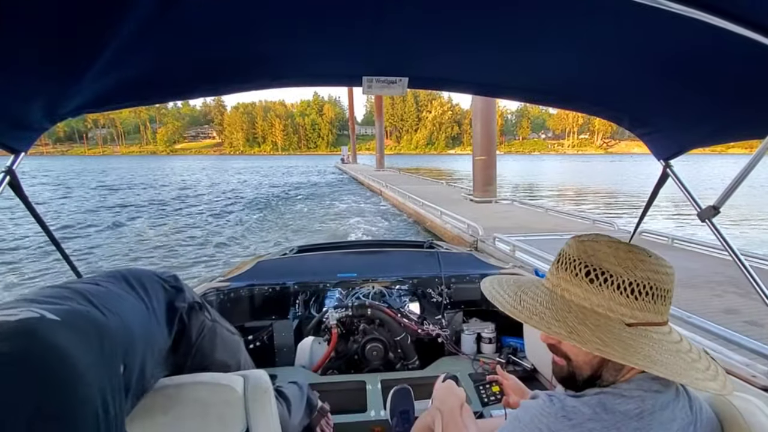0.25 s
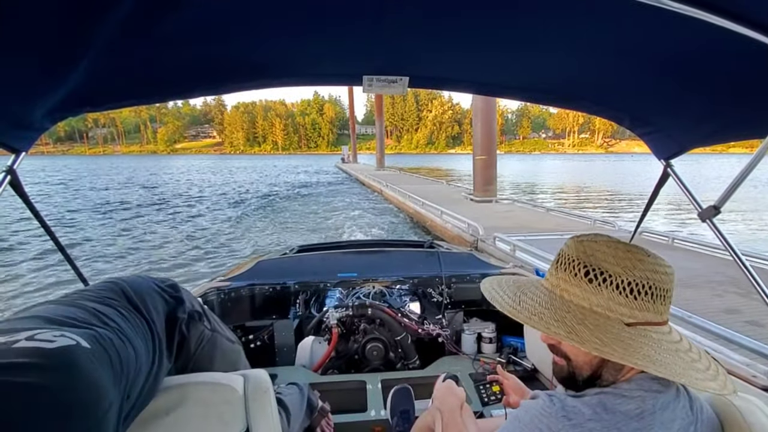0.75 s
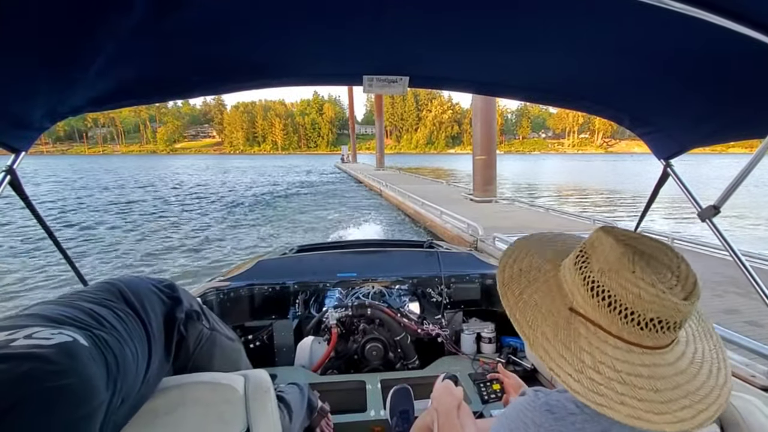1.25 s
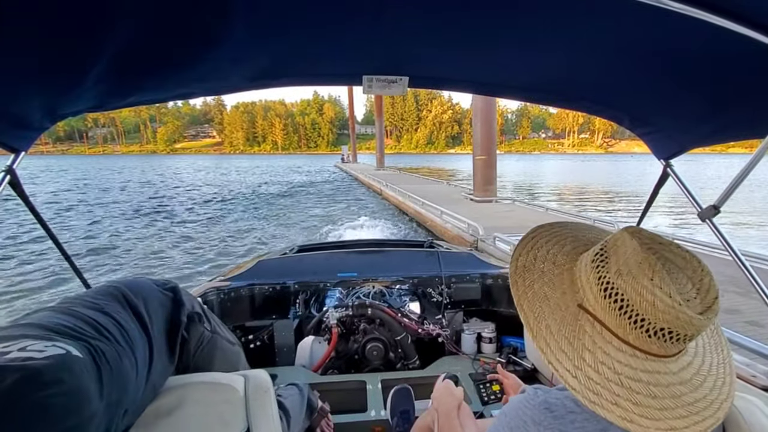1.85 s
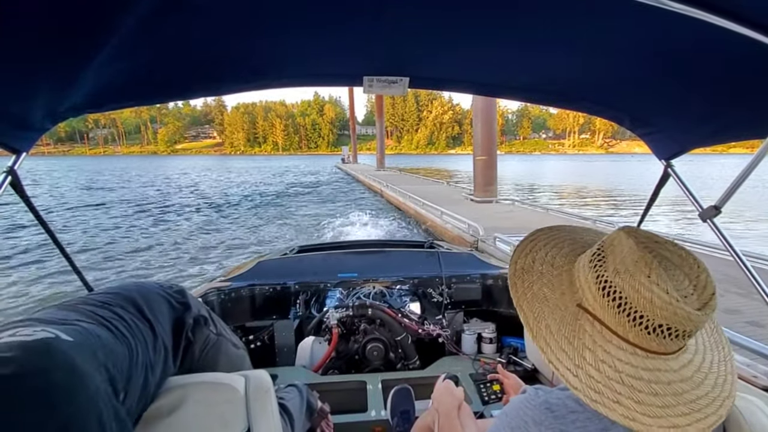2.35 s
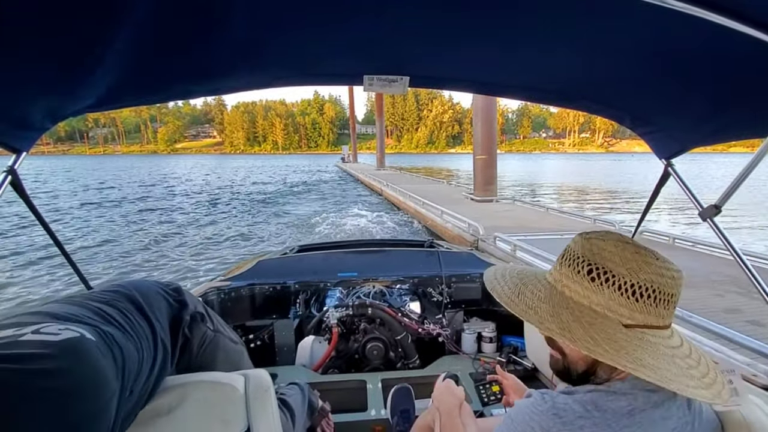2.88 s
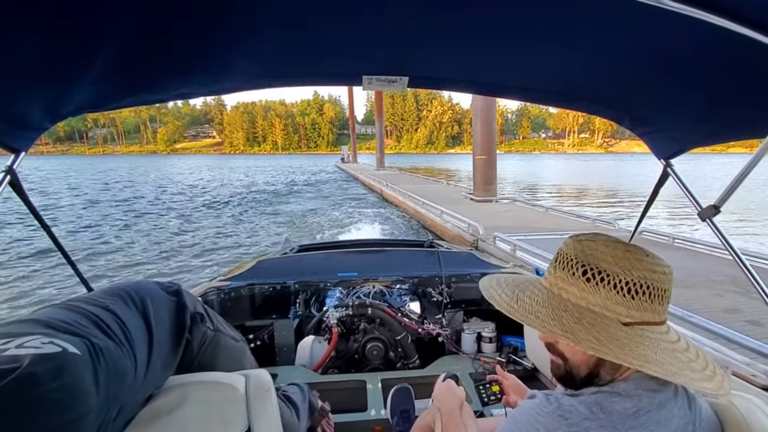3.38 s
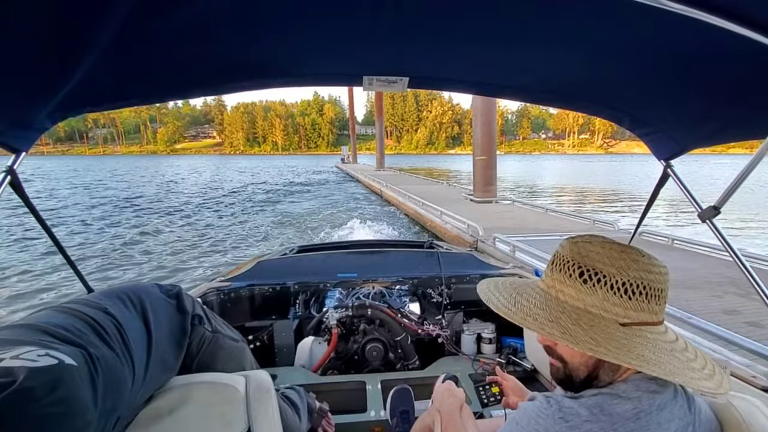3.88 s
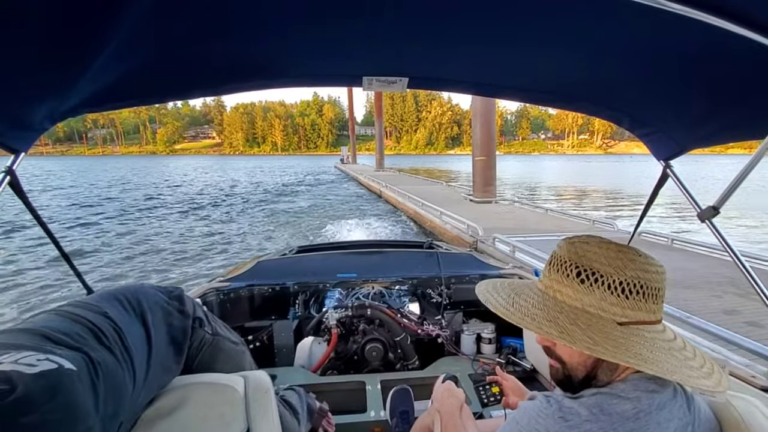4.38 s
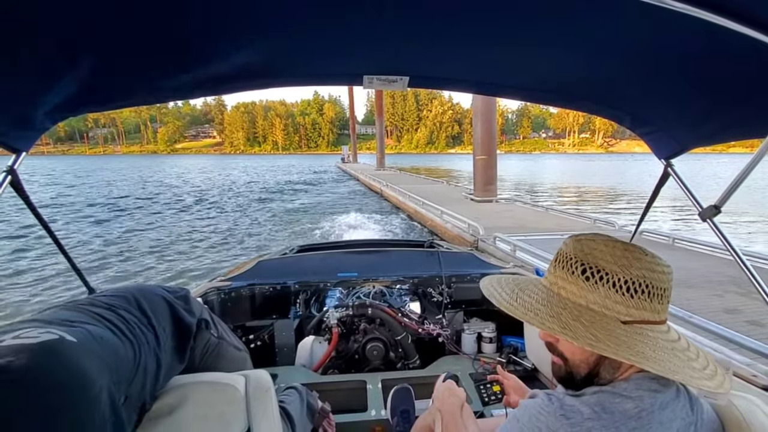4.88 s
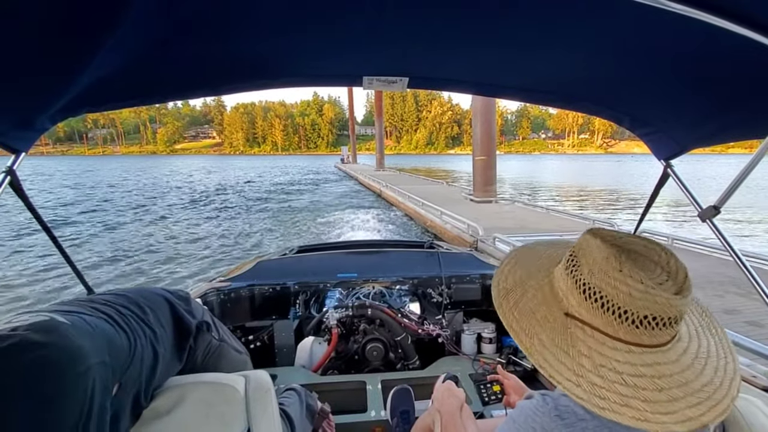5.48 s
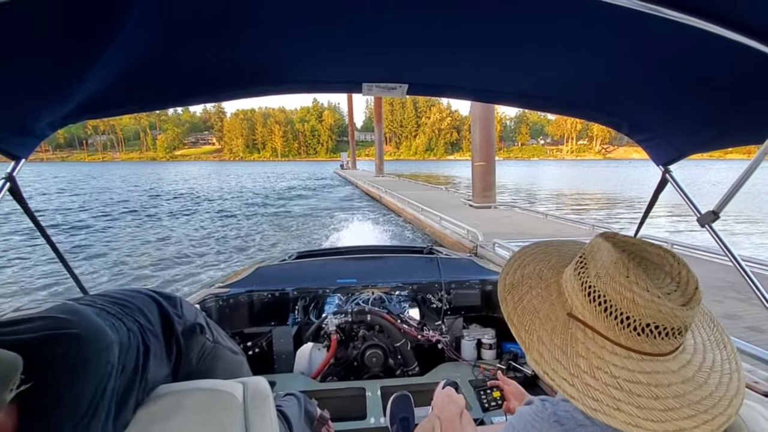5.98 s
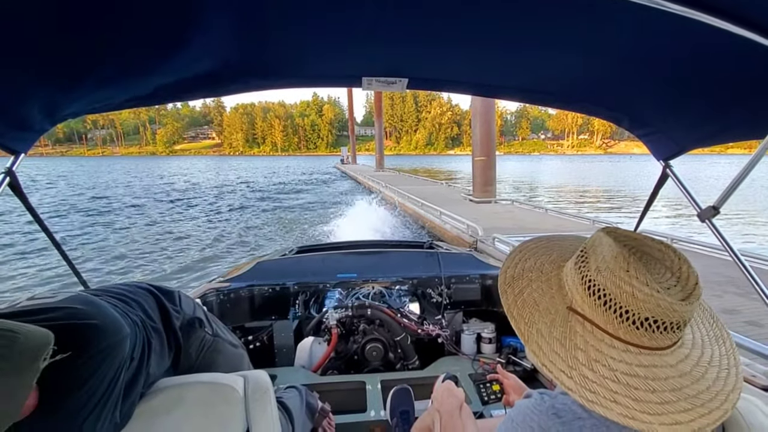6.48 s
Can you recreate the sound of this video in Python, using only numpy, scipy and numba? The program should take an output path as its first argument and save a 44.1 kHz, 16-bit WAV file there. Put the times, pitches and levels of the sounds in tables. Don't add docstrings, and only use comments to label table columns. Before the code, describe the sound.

A jet boat engine idles unevenly, heard close in stereo outdoors: low booming hum, wet bubbling and thumping water slugs, metallic clatter and a faint hiss of water astern. Something hard lightly taps trim early on. The exhaust note is repeatedly muffled just before five seconds, then the throttle opens, the pitch climbs quickly, and splashing water grows over the clatter until the end.

```python
import sys
import numpy as np
from scipy import signal
from scipy.fft import rfft, irfft, next_fast_len
from scipy.io import wavfile
from scipy.ndimage import uniform_filter1d, map_coordinates
from numba import njit

SR = 44100
rng = np.random.default_rng(int(sys.argv[2]) if len(sys.argv) > 2 else 0)


def linear_from_db(decibels):
    return 10 ** (np.asarray(decibels, float) / 20)


def log_audio(samples):
    frames = np.atleast_2d(samples).T
    limited = np.clip(frames, -1, 1)
    pcm = np.round(limited * 32767).astype(np.int16)
    wavfile.write(sys.argv[1], SR, pcm)


N = 296793

# (time [s], firing rate [Hz])
FIRING = [(0.0, 70.3), (0.4, 67.7), (0.75, 68.6), (0.95, 67.2), (1.2, 67.8), (1.45, 69.5), (1.85, 66.3),
          (2.1, 68.5), (2.7, 67.2), (3.1, 68.7), (3.9, 66.5), (5.28, 66.4), (5.5, 74.6), (5.7, 89.7),
          (5.95, 102.3), (6.25, 105.4), (6.45, 101.2), (6.73, 102.4)]
# (time [s], boom level [dB])
BOOM = [(0, -14), (.2, -10.5), (.55, -14.5), (.95, -9.5), (1.04, -11.5), (1.16, -18), (1.45, -15.5),
        (1.97, -11.5), (2.7, -13), (2.78, -15.5), (3.26, -14), (3.45, -22), (3.55, -14), (4.05, -12.5),
        (4.13, -16), (4.8, -15.5), (5.35, -16.5), (5.52, -12)]
# (time [s], depth [dB], half length [s])
CHOKES = [(0.052, -7, 0.064), (0.168, -3.5, .04), (.315, -7.5, 0.048), (0.407, -9.5, 0.063),
          (.88, -4, 0.047), (0.986, -8, 0.032), (1.077, -13.5, 0.062), (1.33, -3.5, 0.061),
          (1.475, -10, 0.035), (3.072, -7.5, 0.026), (3.315, -12, 0.082), (3.495, -6, 0.034),
          (3.58, -9, 0.037), (3.69, -6.5, 0.098), (3.855, -9, 0.044), (3.942, -4.5, 0.056),
          (4.42, -3.5, 0.054), (4.64, -8.5, 0.094), (4.848, -13, 0.037), (4.927, -16, .05),
          (5.007, -16, 0.06), (5.167, -23, 0.047), (5.3, -15.5, 0.09), (5.418, -11, 0.056),
          (6.005, -10, 0.036), (6.163, -9.5, 0.043), (6.267, -4, 0.099), (6.4, -9, 0.035),
          (6.564, -5, 0.034), (6.638, -0.5, 0.035)]
# (time [s], burble rise [dB], gurgle rise [dB], half length [s])
BELCHES = [(0.247, 14, 0.5, 0.085), (0.793, 15, 6, .12), (1.007, 20.5, 12.5, 0.039), (1.82, 6, 2.5, 0.24),
           (2.102, 20, 1, 0.11), (2.304, 6.5, 3, 0.2), (2.6, 16.5, 0, 0.25), (3.363, 12, 0.5, 0.12),
           (3.61, 5, 2.5, 0.14), (4.17, 19, -7, .1), (4.483, 12, -1, .1), (4.877, 12, 0, 0.36),
           (5.148, 11.5, -2.5, .04), (5.303, 9, 0.5, 0.15), (6.135, 2, 3, .09), (6.32, 5, 2.5, 0.076)]
# (pitch [Hz], width [Hz], idle level [dB], gain on throttle [dB])
PIPE = [(241.8, 46.6, 2.5, -1), (323, 52, 0, 3), (438.4, 43, 0, 4), (561, 73, -1.5, 5),
        (677, 42, -5.5, 4.5)]
# (time [s], peak level [dB], pitch [Hz], ring [s])
SLUGS = [(0.243, -18, 178, 0.034), (1.004, -13.5, 195, 0.063), (2.092, -18, 161, 0.093),
         (2.556, -25.5, 220, 0.095), (2.716, -23, 288, 0.079), (3.265, -21, 282, 0.095),
         (3.347, -25, 264, 0.085), (3.558, -18, 241, 0.081), (4.13, -17, 220, 0.062),
         (4.156, -11.5, 161, 0.077), (4.992, -11, 430, 0.042), (5.163, -25, 175, 0.082),
         (5.227, -18, 359, 0.094), (5.896, -20, 438, 0.13), (6.134, -13, 310, 0.055),
         (6.607, -17.5, 161, 0.1), (6.689, -14.5, 376, 0.092)]
# (pitch [Hz], width [Hz], idle level [dB], gain on throttle [dB])
BLOCK = [(783, 29, 1.5, -11), (852, 39, 1.5, -9), (1025, 34, -2.5, 0), (1108.5, 33, 0, -1),
         (1368, 77, -6.5, 9), (1916, 270, 1.5, -2.5), (2260, 100, 1, -11), (2780, 100, -1, -3)]
# (pitch [Hz], width [Hz], idle level [dB], gain on throttle [dB])
TICKS = [(3240, 590, -1, -7), (4980, 1100, 3.5, -1), (6750, 1400, 0, 4.5), (10900, 7800, -1.5, 7)]
# (time [s], peak level [dB])
KNOCK = [
    (2.1453, -23.5),
]
# (time [s], spray level [dB])
JET = [(0, -39), (.7, -38.5), (.95, -39), (1.2, -38), (1.85, -36), (2.05, -39), (2.9, -39), (3.1, -38),
       (3.5, -37), (3.8, -36), (4.4, -35), (5.2, -36), (5.32, -34), (5.5, -30.5), (5.75, -31), (6.3, -29),
       (6.45, -31), (6.73, -27.5)]
# (frequency [Hz], density [dB per Hz])
SPRAY = [(500, -17), (700, -7.5), (1300, -4), (1620, -7.5), (2100, -5.5), (2600, -13.5), (4000, -17),
         (4500, -16), (7800, -16), (9400, -20), (10500, -18), (12000, -15.5), (15600, -16.5)]
# (pitch [Hz], width [Hz], level [dB])
CANOPY = [(2530, 82, 3.5), (3050, 100, 6.5), (3320, 190, 4.5), (3700, 87, 6), (4120, 250, 0.5),
          (4310, 98, 7), (4674, 74, 9.5), (5040, 100, 5), (5470, 210, 7.5), (5880, 200, 4.5),
          (6740, 230, 5), (7300, 200, 3), (8250, 160, 5), (9560, 300, -2), (10800, 250, 4)]
# (frequency [Hz], left-right correlation [-1 to 1])
SPRAY_LIKENESS = [(600, 1), (1500, 0.89), (3000, 0.19), (6000, 0.12), (15000, -0.16)]
# (frequency [Hz], left minus right [dB])
SPRAY_PAN = [(600, -2), (2000, 3), (4500, -4), (8000, 1.5), (13000, 0.3)]

IDLE_HZ, CRUISE_HZ = 68, 103
FREE_BOOM_DB, IDLE_FLOW_DB = -14, -38
BURBLE_DB, GURGLE_DB, BAY_DB, CHUFF_DB = -43.5, -39.5, -37.5, -7
BURBLE_FOLLOWS = 0.54
GURGLE_FOLLOWS, BAY_FOLLOWS = 0.71, 0.69
CHUFF_PULL_DB, PULL_HZ_PER_S = 5, 42
CHUFF_FADE_DB = -6
BOOM_SAG_DB_PER_S, SAG_FROM_S = -3, 5.12
TOP_HZ, BASS_CUT_HZ = 15520, 36
PORT_LAG = 4
SIDES = np.array([[1], [-1]])


def unit(x):
    return x / np.sqrt(np.mean(x ** 2))


def columns(table):
    s, *rest = np.transpose(table)
    return [np.interp(np.arange(N) / SR, s, c) for c in rest]


def at(table, hz):
    table_hz, value = np.transpose(table)
    return np.interp(np.log(hz), np.log(table_hz), value)


def bumps(times, sizes_db, halves):
    t = np.arange(N) / SR
    return sum(db * np.clip(1 - abs(t - s) / half, 0, 1) for s, db, half in zip(times, sizes_db, halves))


def beat(turns, sharp):
    return np.exp(sharp * (np.cos(2 * np.pi * turns) - 1))


def walk(rate):
    hold = int(SR / rate)
    steps = np.repeat(rng.standard_normal(N // hold + 1), hold)
    return 1.7 * uniform_filter1d(uniform_filter1d(steps, hold), hold)[:N]


def grit(scatter_db):
    return unit(rng.standard_normal(N) * linear_from_db(scatter_db * rng.exponential(size=N)))


def spread(make, like):
    like = np.clip(like, -.99, .99)
    shared = np.sqrt((1 + like) / 2) * make()
    return shared + np.sqrt((1 - like) / 2) * make() * SIDES


@njit
def svf(x, hz, width):
    y, b, l = np.empty(len(x)), 0., 0.
    g, k = np.tan(np.pi * hz / SR), width / hz
    for i in range(len(x)):
        v = (b + g * (x[i] - l)) / (1 + g * (g + k))
        b, l, y[i] = 2 * v - b, l + 2 * g * v, k * v
    return y


def steep(x, hz, width):
    return svf(svf(x, hz, width), hz, width)


def resonate(drive, modes, throttle, scatter_db, flutter_db):
    out = 0
    for hz, width, db, gain_db in modes:
        ring = unit(steep(drive * grit(scatter_db), 1. * hz, 1.62 * width))
        out = out + linear_from_db(db + gain_db * throttle + flutter_db * walk(16)) * ring
    mean_gain_db = np.mean(np.array(modes)[:, 3])
    return unit(out / linear_from_db(mean_gain_db * throttle))


def boom(firings, boom_db, throttle):
    chance = rng.standard_normal((1000, 2)).T
    size, late = (map_coordinates(np.clip(c, -2, 2), [firings], order=2) for c in chance)
    turn = 2 * np.pi * (firings + 0.013 * late)
    wave = np.sin(turn) + linear_from_db(-35) * np.sin(2 * turn + 0.96)
    wave = wave + linear_from_db(-45 + 16 * throttle) * np.sin(3 * turn)
    wave = wave + linear_from_db(-37.5 + 11.6 * throttle) * np.sin(4 * turn)
    swell = unit(linear_from_db(1.5 * size) * wave)
    sway = linear_from_db(-15) * walk(25) * np.cos(turn) * SIDES
    hull = spread(lambda: unit(steep(rng.standard_normal(N), 81.0, 30.0)), like=1.0)
    hull_db = uniform_filter1d(boom_db, SR // 4) - 22 + 7.5 * throttle
    return linear_from_db(boom_db) * (swell + sway) + linear_from_db(hull_db) * hull


def gurgle(firings, throttle):
    push = 0.63 + np.exp(-(firings % 1) / 0.57)
    return unit(spread(lambda: resonate(push, PIPE, throttle, scatter_db=1.8, flutter_db=2.2), like=.55))


def burble():
    return spread(lambda: unit(svf(svf(grit(1.4), 139.0, 91.0), 120.0, 100.0)), like=0.34)


def slugs():
    out, t = np.zeros(N + SR), np.arange(SR // 4) / SR
    for s, db, hz, ring in SLUGS:
        fade = np.exp(-np.log(1000) * t / max(ring, .01)) * (1 - np.exp(-t / 0.0033))
        bubble = np.sin(2 * np.pi * hz * t * (1 + 1.8 * t))
        slap = unit(svf(rng.standard_normal(len(t)), 2.2 * hz, 1.3 * hz))
        out[int(s * SR):][:len(t)] += linear_from_db(db) * fade * (0.85 * bubble + 0.3 * slap)
    return out[:N]


def block(firings, throttle):
    drive = 0.39 + .5 * beat(firings, sharp=1.3) + 0.15 * beat(firings / 4 + 0.22, sharp=2.1)
    return unit(spread(lambda: resonate(drive, BLOCK, throttle, scatter_db=0.4, flutter_db=1.5), like=0.55))


def chuff(firings):
    drive = (0.36 + beat(firings / 8 - .02, sharp=2.5)) * linear_from_db(2.2 * walk(9))
    return unit(spread(lambda: steep(drive * grit(1.5), 1267.0, 71.0), like=0.62))


def valves(firings, throttle):
    crank = firings / 4 + 0.24
    strong = beat(crank, sharp=1.8) * linear_from_db(1.6 * np.cos(np.pi * crank + 0.3))
    drive = strong + 0.17 * beat(crank + .5, sharp=8.0)
    return unit(spread(lambda: resonate(drive, TICKS, throttle, scatter_db=1.6, flutter_db=1.8), like=0.038))


def knock():
    out, t = np.zeros(N), np.arange(SR // 10) / SR
    for s, db in KNOCK:
        burst = rng.standard_normal(len(t)) * np.exp(-t / .008) * (1 - np.exp(-t / .002))
        trim = svf(burst, 1960.0, 1300.0) + 0.63 * svf(burst, 3650.0, 400.)
        trim = trim + 0.11 * steep(burst, 5600.0, 4000.)
        out[int(s * SR):][:len(t)] += linear_from_db(db + 16.5) * trim
    return out


def spray(bay_db, spray_db):
    low, high, surge, size = 0, 0, walk(14), next_fast_len(N)
    freq = np.fft.rfftfreq(size, 1 / SR) + 1
    canopy_db = sum(db / (1 + (2 * (freq - hz) / width) ** 2) for hz, width, db in CANOPY)
    colour = linear_from_db(at(SPRAY, freq) + canopy_db) * (freq < TOP_HZ)
    for hz in 500 * 2 ** np.arange(0, 5.1, .5):
        window = colour * np.cos(np.pi * np.clip(np.log2(freq / hz), -.5, .5))
        splash = spread(lambda: rfft(grit(1.5), size), at(SPRAY_LIKENESS, hz))
        pan_db = at(SPRAY_PAN, hz) * SIDES / 2
        band = irfft(splash * window, size)[:, :N] * linear_from_db(pan_db + 0.5 * surge + 0.18 * walk(12))
        if hz < 2500:
            low = low + band
        else:
            high = high + band
    return unit(low) * linear_from_db(bay_db - 2.5) + unit(high) * linear_from_db(spray_db + 2.5)


def rumble():
    return linear_from_db(-44.5) * spread(lambda: unit(svf(rng.standard_normal(N), 36., 30.)), like=0.41)


def scene():
    (hz,), (breath_db,), (spray_db,) = map(columns, (FIRING, BOOM, JET))
    firings = np.cumsum(hz) / SR
    throttle = np.clip((hz - IDLE_HZ) / (CRUISE_HZ - IDLE_HZ), 0, 1)
    pull = np.clip(uniform_filter1d(np.gradient(hz) * SR, SR // 3) / PULL_HZ_PER_S, 0, 1)

    sag_db = BOOM_SAG_DB_PER_S * np.clip(np.arange(N) / SR - SAG_FROM_S, 0, None)
    boom_db = breath_db + sag_db + bumps(*np.transpose(CHOKES))
    times, burble_rise_db, gurgle_rise_db, halves = np.transpose(BELCHES)
    burble_db = BURBLE_DB + BURBLE_FOLLOWS * (breath_db - FREE_BOOM_DB)
    burble_db = burble_db + bumps(times, burble_rise_db, halves)
    flow_db = spray_db - IDLE_FLOW_DB
    gurgle_db = GURGLE_DB + GURGLE_FOLLOWS * flow_db + bumps(times, gurgle_rise_db, halves)
    bay_db = BAY_DB + BAY_FOLLOWS * flow_db
    chuff_db = bay_db + CHUFF_DB + CHUFF_PULL_DB * pull + CHUFF_FADE_DB * throttle

    wet = linear_from_db(gurgle_db + 2.0) * gurgle(firings, throttle)
    wet = wet + linear_from_db(burble_db) * burble() + linear_from_db(-0.5) * slugs()
    exhaust = boom(firings, boom_db, throttle) + wet * linear_from_db(0.4 * SIDES)
    bay = linear_from_db(bay_db - 1.5) * block(firings, throttle)
    bay = bay + linear_from_db(chuff_db) * chuff(firings) + linear_from_db(-42.5) * valves(firings, throttle)
    return exhaust + bay + knock() + spray(bay_db, spray_db) + rumble()


def roll_off(x):
    return signal.sosfilt(signal.butter(12, 15660, fs=SR, output="sos"), x)


def record(dry):
    ports = np.array([dry[0], np.roll(dry[1], PORT_LAG)])
    bass_cut = signal.butter(2, BASS_CUT_HZ, "high", fs=SR, output="sos")
    return roll_off(signal.sosfilt(bass_cut, ports))


dry = scene()
out = record(dry)
log_audio(out)
```